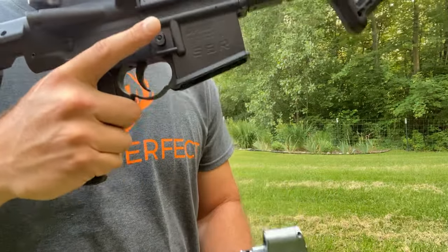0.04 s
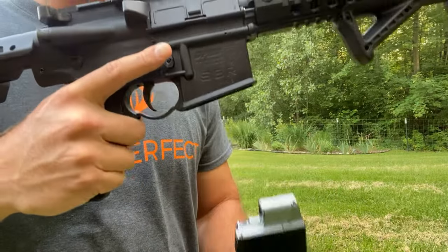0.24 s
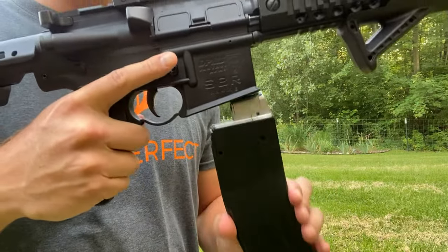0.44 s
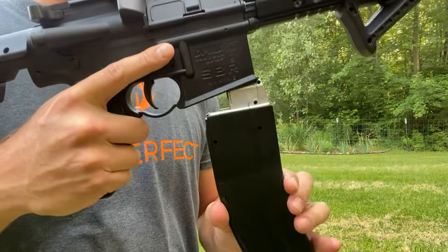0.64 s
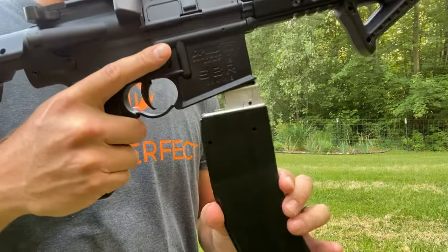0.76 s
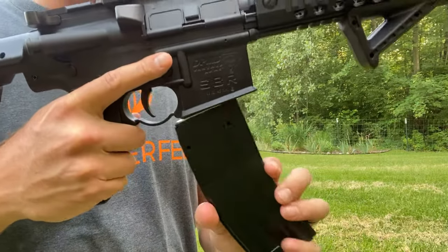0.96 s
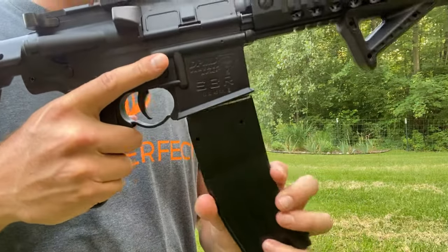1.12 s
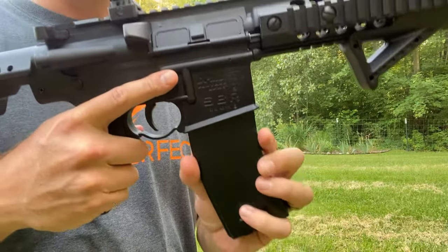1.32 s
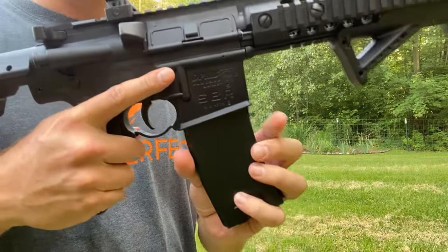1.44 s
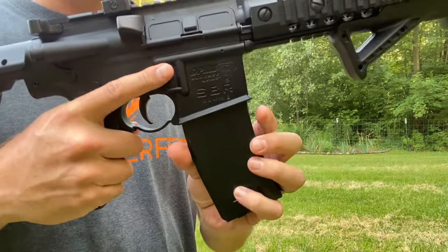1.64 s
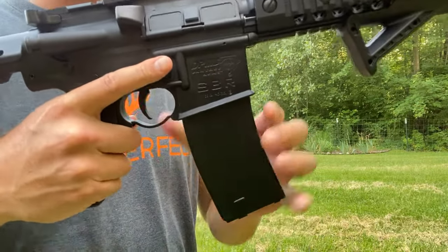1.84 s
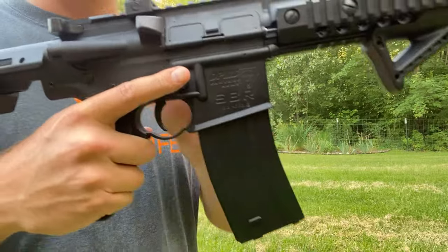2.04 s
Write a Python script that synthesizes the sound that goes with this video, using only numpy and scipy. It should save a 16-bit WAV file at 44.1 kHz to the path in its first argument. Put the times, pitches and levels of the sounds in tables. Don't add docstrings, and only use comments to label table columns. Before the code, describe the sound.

A hollow plastic magazine with a metal head knocks an airgun rifle, scrapes and rattles up into its well, then seats with a hard click; close stereo microphone on a quiet lawn.

```python
import sys
import numpy as np
from scipy import signal
from scipy.fft import rfft, irfft, next_fast_len
from scipy.io import wavfile
from scipy.ndimage import map_coordinates

SR = 44100
rng = np.random.default_rng(int(sys.argv[2]) if len(sys.argv) > 2 else 0)


def gain_from_decibels(decibels):
    exponent = np.asarray(decibels, float) / 20
    return 10 ** exponent


def wrap_up_sound(samples):
    columns = np.atleast_2d(samples).T
    tamed = np.clip(columns, -1, 1)
    steps = np.round(tamed * 32767).astype(np.int16)
    wavfile.write(sys.argv[1], SR, steps)


N = 91772
MS = 0.001


def unit(x):
    return x / np.sqrt(np.mean(x ** 2) + 1e-20)


def along(points, hz):
    f, value = np.transpose(points)
    return np.interp(np.log(hz + 1), np.log(f + 1), value)


def wobble(rate):
    knots = rng.standard_normal(int(N * rate / SR) + 4)
    return map_coordinates(knots, [np.arange(N) * rate / SR])


def filtered(x, response):
    m = next_fast_len(N + SR // 2)
    spectrum = rfft(x, m) * response(np.fft.rfftfreq(m, 1 / SR))
    return irfft(spectrum, m)[..., :N]


def gate(start, stop, rise):
    t = np.arange(N) / SR
    return np.clip(np.minimum(t - start, stop - t) / rise, 0, 1)


def resonances(peaks):
    def response(f):
        total = 0
        for k, (hz, width, db) in enumerate(peaks):
            total = total + (-1) ** k * gain_from_decibels(db) * 1j * f * width / (hz * hz - f * f + 1j * f * width)
        return total
    return response


def ports(x, tilt, lead):
    side = np.array([[1], [-1]])

    def response(hz):
        level = gain_from_decibels(side * along(tilt, hz) / 2)
        return level * np.exp(0.5j * side * np.interp(hz, *np.transpose(lead)))
    return filtered(x, response)


GRIP_POWER = 1.31


def ring(modes, t, rise, scatter_db, lasts=1):
    hz, db, t60 = np.transpose(modes)[:, :, None]
    level, tuning, phase = rng.standard_normal((3, len(modes), 1))
    t = np.maximum(t, 0)
    scattered = scatter_db > 0
    decay = gain_from_decibels(db + scatter_db * level - 60 * (t / (t60 * lasts)) ** GRIP_POWER)
    tones = np.sin(2 * np.pi * hz * (1 + 0.019 * scattered * tuning) * t + phase * scattered)
    return (decay * tones).sum(0) * (1 - np.exp(-t / rise))


# start in seconds, peak in dB, shell pitch in Hz, ring t60 in ms, upper shell in dB.
KNOCKS = [(0.3123, -39, 1584, 9.6, -24), (0.314, -39.5, 743, 11.2, -16), (0.48, -18, 643, 15.3, -5.5),
          (0.4815, -8, 1200, 10.8, -18), (.486, -21, 1710, 13, -6), (0.4914, -18, 1420, 8, -5),
          (0.4996, -27.5, 1275, 35, -4.5), (.573, -48.5, 1980, 14, 3), (.6112, -32.5, 836, 13, -8),
          (0.6177, -31, 1540, 15, -8), (.6238, -27, 1526, 13, -15), (0.6268, -29.5, 1720, 13.6, -17),
          (0.758, -39, 1910, 14.6, -3), (0.806, -43.5, 1250, 15, -20), (1.446, -34, 1727, 7.1, -13),
          (1.447, -37, 1300, 11, -18.5), (1.793, -57.5, 1833, 8.6, -1), (1.811, -50.5, 1843, 11, -16.5),
          (1.822, -41.5, 1920, 16.4, -5),
          (0.847, -20, 1203, 18, -14.5), (0.8539, -24.5, 1185, 17, -10.5), (.899, -14.5, 1256, 12.2, -15),
         (.9035, -22.5, 1075, 13.7, -11), (0.906, -22, 1463, 15.6, -4.5), (0.9375, -10, 1017, 16.8, -21),
         (0.9404, -16, 1865, 24, -13.5), (0.9433, -13.5, 1036, 11.2, -7.5), (0.9479, -17, 1501, 14, -9),
         (0.9519, -10, 1815, 11.2, -12), (0.958, -24, 1704, 24, -8), (0.966, -26.5, 1182, 12, -8.5),
         (.984, -23.5, 1490, 14.2, -5.5), (1.002, -36.5, 800, 13, -27), (1.0569, -11, 1190, 10, -19.5),
         (1.0674, -24.5, 1211, 11, -20), (1.1004, -4.5, 1025, 18, -8), (1.1034, -11, 1720, 17.5, -9),
         (1.1115, -25, 997, 21, -16.5), (1.1215, -18.5, 1230, 13.6, -23), (1.1332, -27.5, 1200, 6.6, -19.5),
          (1.1642, -23.5, 1790, 14.3, -15), (1.1747, -26.5, 1410, 8.2, -8.5), (1.179, -26.5, 764, 22, -24),
           (1.1893, -17.5, 1450, 5.4, -5.5), (1.1925, -22.5, 910, 9.8, -16.5),
           (1.2015, -19.5, 1598, 6.2, -7.5), (1.2036, -24.5, 818, 17, -28.5), (1.2395, -31.5, 1380, 9, -11),
           (1.2759, -24.5, 720, 19, -9.5), (1.2945, -21, 1460, 21, 0), (1.2967, -10.5, 809, 19, -12.5),
           (1.307, -27.5, 980, 11, -4.5), (1.309, -18.5, 1460, 15, -6), (1.33, -24, 766, 16, -10),
           (1.34, -27.5, 1405, 8.7, -6), (1.3748, -22, 1300, 5.8, -9.5), (1.3859, -8, 960, 12.2, -1),
           (1.3883, -10, 1273, 11.5, -7.5), (1.4037, -27.5, 985, 9.1, -7.5)]
# pitch in Hz, level in dB, t60 in seconds.
SHELL = [(571, -13.5, 0.025), (888, 0.5, 0.0095), (1382, -4.5, 0.011), (2346, -8, 0.015)]
# pitch in Hz, level in dB, t60 in seconds.
UPPER = [(1720, -5.5, 0.016), (1920, 0, 0.0089), (2756, -1.5, 0.01), (3390, -10.5, 0.0044)]
# start in seconds, level in dB, pitch in Hz.
THUDS = [
    (1.386, -23, 250),
    (1.387, -26, 480),
    (1.1, -33, 300),
    (1.33, -34, 370),
    (2.058, -42, 550),
    (1.447, -37, 430),
    (.614, -39, 300),
    (.94, -33, 220),
    (1.005, -40, 420),
]
# start in seconds, level in dB, pitch in Hz, t60 in seconds.
PING = [(2.0726, -30.5, 4650, 0.0051), (2.0726, -38.5, 2700, 0.006), (2.0726, -43, 3900, 0.0031),
        (2.0726, -47.5, 8970, 0.0052), (2.0726, -51, 13300, 0.0057)]
SHELL_DB, SHELL_RISE_S = -6, 0.00065
USUAL_MS = 15.76
MODE_SCATTER_DB = 3


def knocks():
    shell, t = np.zeros(N + SR), np.arange(SR // 12) / SR

    def strike(s, sound):
        shell[round(s * SR):][:len(t)] += sound

    for s, db, hz, ms, upper_db in KNOCKS:
        lasts = ms / USUAL_MS
        body = ring(SHELL, t, SHELL_RISE_S, MODE_SCATTER_DB, lasts)
        upper = ring(UPPER, t, SHELL_RISE_S, MODE_SCATTER_DB, lasts)
        pitch = ring([(hz, 0, ms * MS)], t, SHELL_RISE_S, 0)
        strike(s, gain_from_decibels(db + 2) * (pitch + gain_from_decibels(SHELL_DB) * body + gain_from_decibels(upper_db) * upper))
    for s, db, hz in THUDS:
        strike(s, gain_from_decibels(db) * ring([(hz, 0, 0.014)], t, SHELL_RISE_S, 0))
    for s, db, hz, t60 in PING:
        strike(s, gain_from_decibels(db) * ring([(hz, 0, t60)], t, 0.000154, 0))
    return shell[:N]


def burst(t, rise, t60):
    t = np.maximum(t, 0)
    return rng.standard_normal(len(t)) * (1 - np.exp(-t / rise)) * gain_from_decibels(-60 * t / t60)


# start in seconds, level in dB, rattle t60 in ms, spring over it in dB,
# loudest lip pitch in Hz.
SNAPS = [(.4815, -16, 35, -6, 8440), (0.4993, -36.5, 13, -20, 8050), (0.6146, -31, 21, -16, 4100),
         (0.623, -23.5, 8.1, -7, 7610), (0.7557, -40.5, 11, -7, 6980), (.8456, -40, 8, -20, 3560),
         (0.9372, -21.5, 12, -8, 5230), (.94, -8.5, 30, 1.5, 8350), (0.9535, -26, 8.6, -3, 7930),
         (0.9812, -32.5, 21, -10, 3920), (1.0553, -28, 9, -8.5, 7170), (1.0984, -17, 11, 3, 2870),
         (1.102, -12.5, 29, -3, 8120), (1.1226, -31, 9, -10, 8100), (1.13, -38.5, 8.3, -8, 7900),
         (1.1648, -36.5, 7.1, -9, 3430), (1.1737, -34, 16, -5, 7170), (1.2752, -31, 10.5, -5, 8200),
         (1.2945, -11.5, 19.7, 2, 7150), (1.309, -11.5, 12, -10.5, 8040), (1.342, -31, 11, -8, 8070),
         (1.3859, -4, 25.2, 5, 8590), (1.4017, -33.5, 7.2, -14, 8000), (1.8208, -38, 12.8, -11.5, 7760)]
# pitch in Hz, width in Hz, level in dB.
METAL = [(3100, 1500, -0.5), (4080, 270, -5.5), (5400, 170, -13.5), (6040, 1400, -4), (7570, 450, -5),
         (8290, 540, -3.5), (9800, 760, -6)]
# pitch in Hz, width in Hz, level in dB.
SPRING = [(11690, 550, -5.5), (13000, 300, -2.5)]
METAL_RISE_S, LIP_DB, LIP_T60_S = 0.0008, -15.5, 0.018
SNAP_DB, SNAP_RISE_S, SNAP_T60_S = 0, 0.00007, 0.0045


def snaps():
    rattle, spring, lip = np.zeros((3, N + SR))
    t = np.arange(SR // 12) / SR
    for s, db, ms, spring_db, hz in SNAPS:
        at = slice(round(s * SR), round(s * SR) + len(t))
        crack = gain_from_decibels(SNAP_DB) * burst(t, SNAP_RISE_S, SNAP_T60_S)
        rattle[at] += gain_from_decibels(db) * (burst(t, METAL_RISE_S, ms * MS) + crack)
        spring[at] += gain_from_decibels(db + spring_db) * burst(t, METAL_RISE_S, 0.74 * ms * MS)
        lip[at] += gain_from_decibels(db + LIP_DB) * ring([(hz, 0, LIP_T60_S)], t, METAL_RISE_S, 0)
    metal = filtered(np.diff(rattle)[:N], resonances(METAL))
    return lip[:N] + metal + filtered(spring[:N], resonances(SPRING))


# start in seconds, length in seconds, level in dB,
# metal hiss over it in dB.
STROKES = [(0.5, 0.16, -59, -11), (.608, 0.031, -42, -33), (0.783, .03, -54, -17), (0.804, 0.042, -51, -22),
           (0.832, 0.039, -46.5, -13.5), (0.859, 0.057, -44, -4.5), (.912, 0.085, -48.5, -15.5),
           (1.013, 0.13, -46.5, -15.5), (1.14, 0.028, -50.5, -22), (1.161, 0.055, -41, -15.5),
           (1.216, 0.1, -48, -10.5), (1.31, .04, -35.5, -9), (1.344, 0.048, -40.5, -15.5),
           (1.386, 0.032, -42, -39.5), (1.426, 0.11, -68.5, -0.5), (1.699, 0.063, -62, -16)]
# pitch in Hz, width in Hz, level in dB.
WALLS = [(760, 190, 4.5), (1200, 220, 6.5), (1800, 470, 0.5), (2490, 550, -1), (3000, 800, -15)]
GRAINS_PER_S, GRAIN_DB, GRAIN_SPREAD_DB = 1200, 3, 3
RUB_RISE_S = 0.0052


def scrape():
    slips = rng.random(N) < GRAINS_PER_S / SR
    grains = slips * gain_from_decibels(GRAIN_SPREAD_DB * rng.exponential(size=N)) * rng.choice([-1, 1], N)
    drive = rng.standard_normal(N) + gain_from_decibels(GRAIN_DB) * unit(grains)
    lips, spring = resonances(METAL), resonances(SPRING)
    body = unit(filtered(drive, resonances(WALLS)))
    hiss = unit(filtered(drive, lambda f: lips(f) + gain_from_decibels(-9) * spring(f)))
    press, steel = np.zeros((2, N))
    for s, length, db, hiss_db in STROKES:
        stroke = gate(s, s + length, RUB_RISE_S)
        press += gain_from_decibels(db) * stroke
        steel += gain_from_decibels(db + hiss_db) * stroke
    return gain_from_decibels(1.5 * wobble(90)) * (press * body + steel * hiss)


YARD_DB, YARD_T60_S, YARD_LATE_S, YARD_TOP_HZ = -11, 0.056, 0.0036, 3070


def yard(x):
    t = np.arange(SR // 4) / SR
    tail = rng.standard_normal((2, len(t))) * gain_from_decibels(-60 * t / YARD_T60_S) * (t > YARD_LATE_S)
    answer = signal.fftconvolve(x[None], tail / np.linalg.norm(tail[0]), axes=1)[:, :N]
    return gain_from_decibels(YARD_DB) * filtered(answer, lambda hz: 1 / (1 + (hz / YARD_TOP_HZ) ** 2) ** 2)


# frequency in Hz, level in dB per Hz.
TRAFFIC = [(13, -76.5), (22, -48.5), (102, -11.5), (125, -18.5), (167, -15), (700, -58.5), (910, -79.5),
           (1540, -120)]
# pitch in Hz, wander in Hz, level in dB.
HUM = [(60, 7.6, -55), (98, 7.3, -57.5), (146.7, 14, -58)]
TRAFFIC_DB = -56.5


def traffic():
    rumble = unit(filtered(rng.standard_normal(N), lambda hz: gain_from_decibels(along(TRAFFIC, hz))))
    hums = np.zeros(N)
    for hz, wander, db in HUM:
        phase = 2 * np.pi * np.cumsum(hz + wander * wobble(20)) / SR
        hums += gain_from_decibels(db + 3 * wobble(16)) * np.sin(phase)
    return gain_from_decibels(TRAFFIC_DB + 0.34 * wobble(1.3)) * rumble + hums


def band(hz, width_hz):
    return unit(filtered(rng.standard_normal(N), lambda f: np.exp(-((f - hz) / width_hz) ** 2)))


# frequency in Hz, level in dB per Hz.
LEAVES = [(170, -30.5), (330, -8), (1070, -15.5), (1700, -21.5), (3800, -29), (8300, -27.5), (9500, -31),
          (10500, -52.5), (12200, -39.5), (15000, -59)]
# time in seconds, level in dB.
BREEZE = [(0, -63.5), (.45, -62), (.7, -65), (1.5, -67), (1.65, -68), (2.08, -70)]
# start in seconds, stop in seconds, pitch in Hz, width in Hz, level in dB.
INSECTS = [
    (0, 2.08, 6050, 300, 0),
    (.05, .6, 2030, 60, 2),
    (1.965, 2.0, 5000, 60, 6),
    (2.0, 2.07, 5000, 110, -2),
    (1.64, 1.76, 7750, 150, -4),
]
INSECT_DB = -80


def trees():
    breeze_db = np.interp(np.arange(N) / SR, *np.transpose(BREEZE))
    leaves = unit(filtered(rng.standard_normal(N), lambda hz: gain_from_decibels(along(LEAVES, hz))))
    bugs = np.zeros(N)
    for start, stop, hz, width, db in INSECTS:
        level = gain_from_decibels(INSECT_DB + db + 3 * wobble(35))
        bugs += level * gate(start, stop, 0.0059) * band(hz, width)
    return gain_from_decibels(breeze_db + 0.56 * wobble(36)) * leaves + bugs


# frequency in Hz, left-right likeness from 0 to 1.
FAR_ALIKE = [(60, .9), (380, .6), (2380, .2)]
# frequency in Hz, left over right in dB.
FAR_TILT = [(60, -6.5), (380, -5.5), (2380, -1), (15000, -2)]
# frequency in Hz, lead of the left in radians.
FAR_LEAD = [(0, 0), (400, -1.2)]


def far(source):
    def mid_side(hz):
        turn = np.arccos(np.clip(along(FAR_ALIKE, hz), -1, 1)) / 2
        return np.array([np.cos(turn), np.sin(turn)])
    mid, side = filtered(np.array([source(), source()]), mid_side)
    return ports(np.array([mid + side, mid - side]), FAR_TILT, FAR_LEAD)


# frequency in Hz, left over right in dB.
TILT = [(300, -7), (700, -2), (1200, .5), (3000, 1), (6000, -1), (15000, 0)]
# frequency in Hz, lead of the left in radians.
LEAD = [(780, .8), (1300, -.5), (1900, -1.0), (2580, -2.8), (3450, -1.2), (4130, -4.9), (5500, -4.7),
        (6550, -1.1), (16000, 9.8)]
NEAR_LOW_HZ = 246


def scene():
    contacts = knocks() + snaps() + scrape()
    near = filtered(contacts, lambda hz: (1j * hz / (NEAR_LOW_HZ + 1j * hz)) ** 2)
    return ports(near, TILT, LEAD) + yard(near) + far(traffic) + far(trees)


def roll_off(x):
    return signal.sosfilt(signal.butter(12, 16480, fs=SR, output="sos"), x)


CLIP_TOP, MIC_TOP_HZ, MIC_SLOPE = 0.85, 14300, 8


def record(dry):
    rounded = dry / (1 + np.abs(dry / CLIP_TOP) ** 4) ** 0.31
    heard = filtered(rounded, lambda hz: 1 / (1 + (hz / MIC_TOP_HZ) ** MIC_SLOPE))
    return roll_off(heard)


dry = scene()
out = record(dry)
wrap_up_sound(out)
```